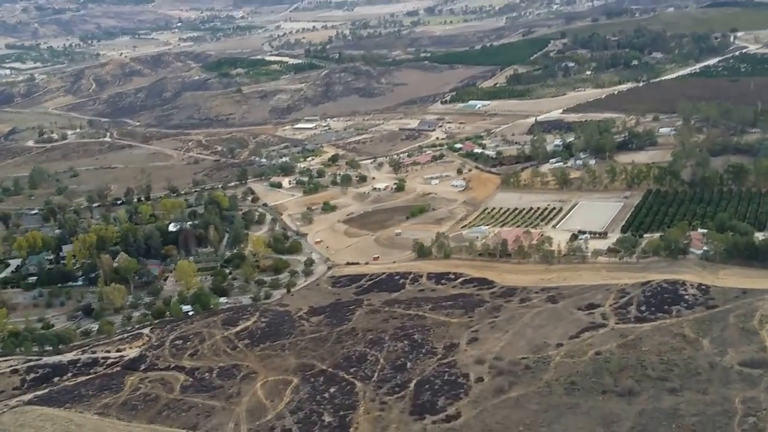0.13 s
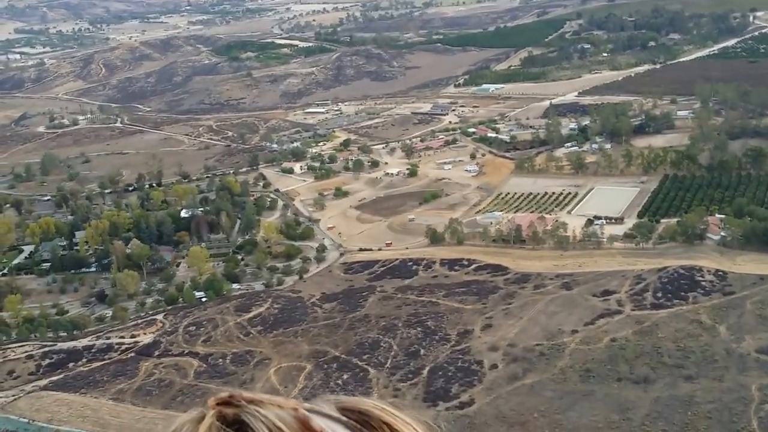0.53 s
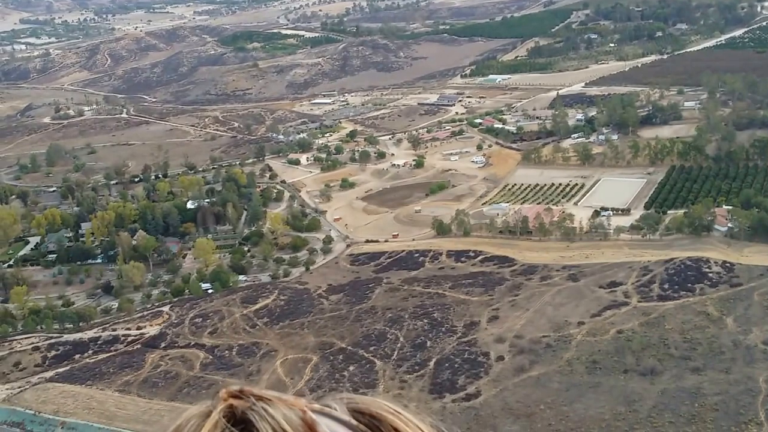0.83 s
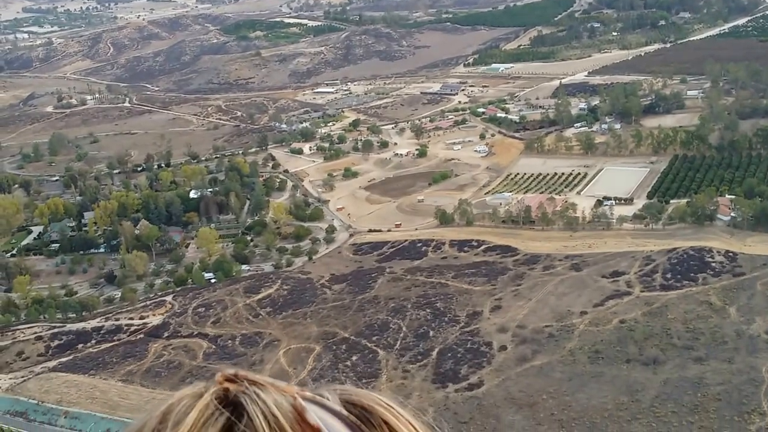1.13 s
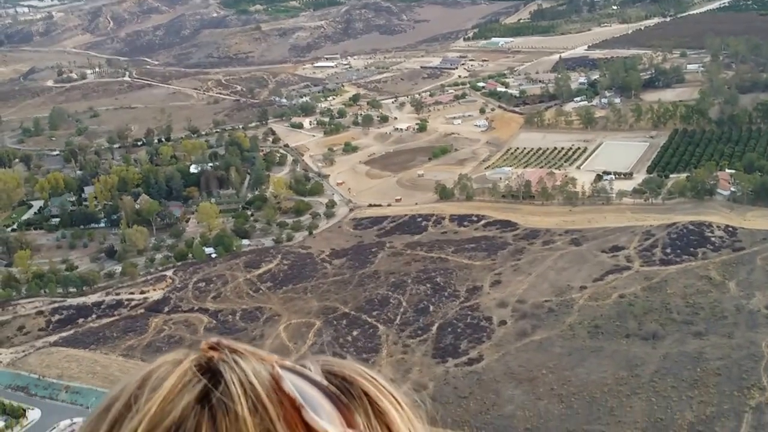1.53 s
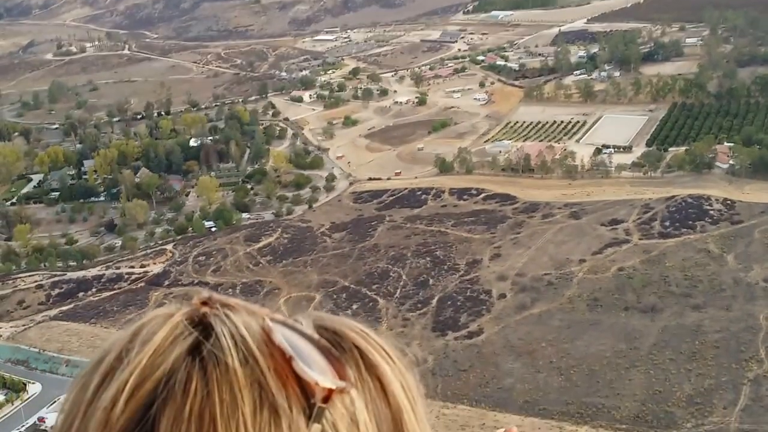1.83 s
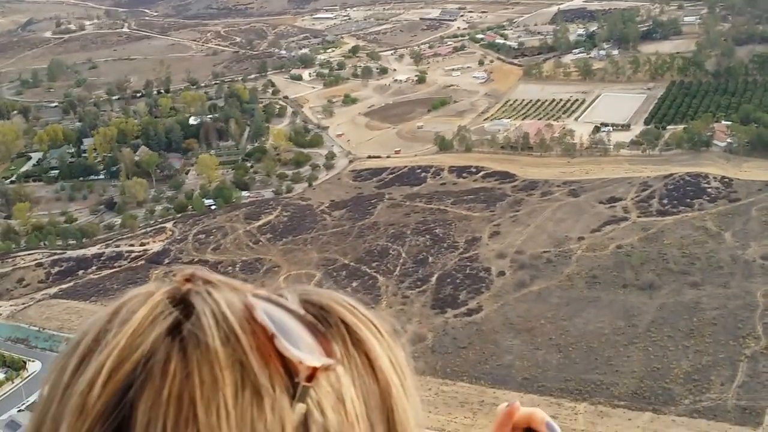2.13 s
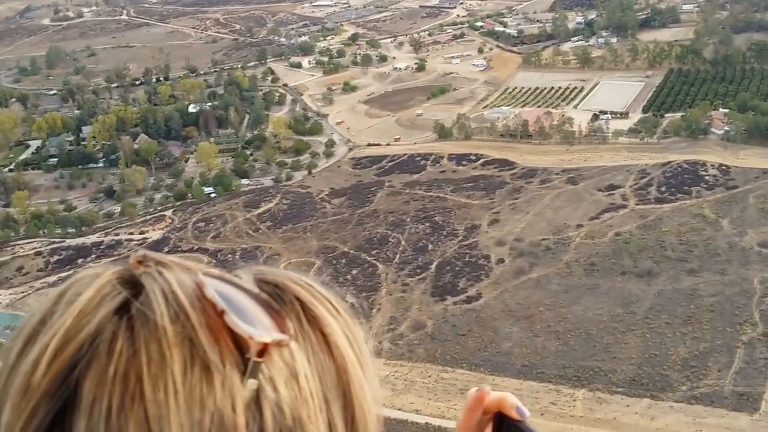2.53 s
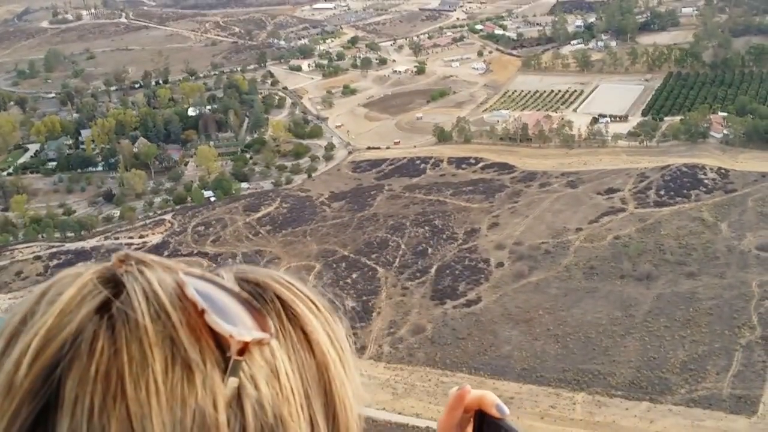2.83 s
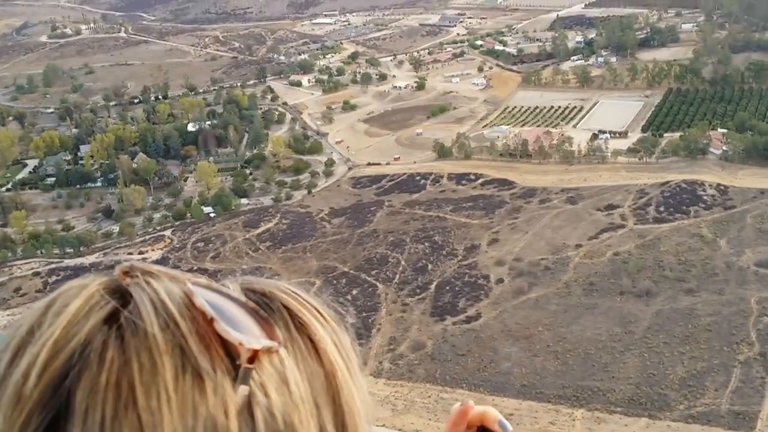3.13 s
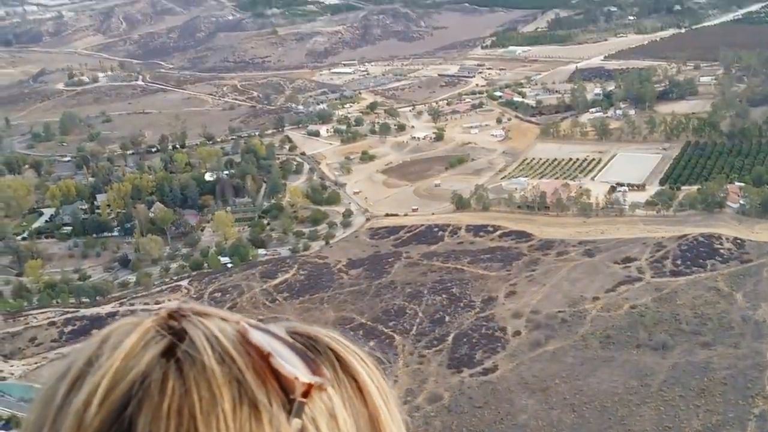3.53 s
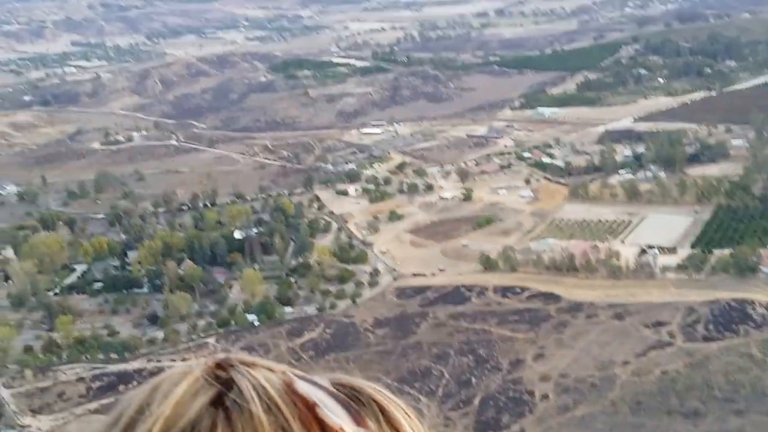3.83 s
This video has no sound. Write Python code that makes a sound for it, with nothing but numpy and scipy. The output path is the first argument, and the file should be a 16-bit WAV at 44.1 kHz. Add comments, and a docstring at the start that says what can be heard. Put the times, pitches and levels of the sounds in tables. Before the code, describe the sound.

A hot-air balloon's gas burner roars loudly and steadily, then cuts off abruptly to soft rushing air.

```python
"""A hot-air balloon's gas burner fires just above the open basket: a turbulent flame roars under the hiss of the gas jets.
The valve closes, the hiss fades, the flame goes out and the last gas spits in quick puffs.
What stays is what ran softly underneath: the rush of the pilot flame and the drone of a distant engine.
Flame, jets, spits and pilot are shaped noise; the engine is a stack of wavering sines."""
import sys
import numpy as np
from scipy import signal
from scipy.fft import rfft, irfft, next_fast_len
from scipy.io import wavfile
from scipy.ndimage import uniform_filter1d, map_coordinates

SR = 44100
rng = np.random.default_rng(int(sys.argv[2]) if len(sys.argv) > 2 else 0)


def materialize(psi):
    """Save the field psi as 16-bit PCM at rate SR to the path in sys.argv[1].

    A 1-D psi becomes a single channel; in a 2-D psi each row is a channel.
    """
    bounded = np.clip(np.atleast_2d(psi).T, -1, 1)
    quanta = np.round(bounded * 32767).astype(np.int16)
    wavfile.write(sys.argv[1], SR, quanta)


N = 176400  # samples, four seconds

# How alike the burner sounds at the two ports: close in the bass, diffuse between some narrow bands above.
# Each row: frequency in Hz, left-right likeness from 0 to 1.
BURNER_LIKENESS = [(100, 1), (450, 0.97), (1000, 0.84), (1300, 0.83), (1500, 0.88), (2050, 0.16),
                   (2350, 0.64), (2900, 0.12), (3350, 0.22), (3700, 0.41), (4100, 0.44), (4550, 0.6),
                   (5100, 0.3), (5800, 0.4), (6300, 0.36), (6850, 0.42), (7350, 0.05), (8000, 0.47),
                   (8800, 0.32), (9600, 0.16), (11200, 0.57), (12700, 0.53), (13400, 0.12), (15000, 0.3)]
BURNER_LEAD_S = 0.0004074  # the burner reaches the left port first


def amp(db):
    """Decibels to gain."""
    return 10 ** (np.asarray(db) / 20)


def unit(x):
    """Scaled to rms 1."""
    return x / np.sqrt(np.mean(x ** 2) + 1e-20)


def along(points, hz):
    """Reads a (Hz, value) curve at hz, with straight lines on a log frequency axis."""
    f, v = np.transpose(points)
    return np.interp(np.log(hz + 1), np.log(f + 1), v)


def curves(rows):
    """One value per sample for each column after the time."""
    s, *columns = np.transpose(rows)
    return [np.interp(np.arange(N) / SR, s, column) for column in columns]


def wobble(rate):
    """A smooth random curve, rate knots a second."""
    knots = rng.standard_normal(4096)
    return map_coordinates(knots, [np.arange(N) * rate / SR], mode="mirror")


def filtered(x, response):
    """x shaped by a complex response of frequency."""
    m = next_fast_len(N + SR // 2)  # spare room so that tails do not wrap round
    return irfft(rfft(x, m) * response(np.fft.rfftfreq(m, 1 / SR)), m)[..., :N]


def rush(spectrum, likeness, lead_s):
    """Stereo noise of rms 1 that reaches the left port lead_s early; mid against side sets the likeness."""
    def mid_side(hz):
        angle = np.arccos(np.clip(along(likeness, hz), -1, 1)) / 2
        return amp(along(spectrum, hz)) * [np.cos(angle), np.sin(angle)]

    def lead(hz):
        # half the lead forward on the left, half back on the right
        return np.exp(1j * np.pi * lead_s * np.outer([1, -1], hz))

    mid, side = filtered(rng.standard_normal((2, N)), mid_side)
    return unit(filtered(np.array([mid + side, mid - side]), lead))


def patchy(x, depth_db):
    """x with slow patches of random gain, about a kilohertz wide and a third of a second long."""
    z = signal.stft(x, nperseg=512)[2]
    field = uniform_filter1d(rng.standard_normal(z.shape), size=12, axis=1)
    field = uniform_filter1d(field, size=60, axis=2)
    return signal.istft(z * amp(depth_db * unit(field)), nperseg=512)[1][:, :N]


def flame(flutter_db):
    """Turbulent burning: a deep roar and a rougher middle range, which collapse from the top down."""
    # Each row: time in seconds, bass level in dB, middle level in dB, both before the trims below.
    flame_levels = [(0.03, -19.5, -25), (0.08, -16, -24), (0.7, -18.3, -24.5), (1.27, -17, -24),
                    (1.44, -16.5, -26), (1.56, -18, -25), (1.66, -17.5, -25.5), (1.95, -18, -26.5),
                    (2.65, -19, -24.5), (2.76, -16, -24), (2.95, -17, -24), (3.2, -18, -24.5)]
    # Colour of the roar. Each row: frequency in Hz, relative density in dB per Hz.
    roar_spectrum = [(25, -40), (38, -42), (55, -11.5), (80, -8), (115, 0.5), (170, -4), (205, 0),
                     (260, -5), (315, -3.5), (350, -9.5), (400, -3.5), (470, -5), (540, -5), (620, -14),
                     (740, -9), (900, -15.5), (1130, -18), (1400, -18), (1650, -20), (2100, -28),
                     (4000, -29.5), (9000, -90)]
    # Stereo lean of the roar. Each row: frequency in Hz, left minus right in dB.
    roar_tilt = [(60, 0), (200, -1.4), (320, -1.5), (390, -0.5), (530, -1), (680, -3), (800, 2.5),
                 (1000, -2.3), (1130, -2.5), (1400, -3), (1620, -7.5), (2200, 2.5)]
    bass_trim_db, middle_trim_db = -0.1, 3.5
    bass_churn_db, middle_churn_db = 0.33, 0.76  # the deep roar is steadier
    split_hz, rumble_hz = 380, 140
    out_s, out_db_per_s2 = 3.1955, 1650  # the flame dies ever faster
    middle_lead_s, rumble_lag_s = 0.011, 0.038  # the middle goes out first, the deepest rumble last
    t = np.arange(N) / SR

    def tilt(hz):
        return amp(np.outer([.5, -.5], along(roar_tilt, hz)))

    def below(x, edge_hz):
        return filtered(x, lambda hz: 1 / (1 + (hz / edge_hz) ** 10))

    def dying(start_s):
        return amp(-out_db_per_s2 * np.maximum(t - start_s, 0) ** 2)

    roar = filtered(rush(roar_spectrum, BURNER_LIKENESS, BURNER_LEAD_S), tilt)
    bass = below(roar, split_hz)
    middle = unit(roar - bass)
    bass = unit(bass)
    rumble = below(bass, rumble_hz)
    bass_db, middle_db = curves(flame_levels)

    low = rumble * dying(out_s + rumble_lag_s) + (bass - rumble) * dying(out_s)
    low = low * amp(bass_db + bass_trim_db + bass_churn_db * wobble(14))
    high = middle * dying(out_s - middle_lead_s)
    high = high * amp(middle_db + middle_trim_db + middle_churn_db * wobble(25.05))
    return (low + high) * amp(flutter_db)


def jets(flutter_db):
    """Gas hisses from the nozzles, shaken by the flame's flutter, finely ragged and drifting in colour."""
    # Gas flow through the jets. Each row: time in seconds, level in dB before the trim below.
    flow_levels = [(0.0, -24), (0.27, -24), (0.38, -26.5), (0.42, -24.5), (1.21, -23), (1.23, -24),
                   (1.72, -22.5), (1.76, -24), (2.65, -23), (2.93, -25.5), (3.2, -30.5), (3.25, -38),
                   (3.305, -59), (3.33, -64)]
    # Colour of the hiss. Each row: frequency in Hz, relative density in dB per Hz.
    hiss_spectrum = [(600, -56), (1900, -9), (3000, -4.5), (4000, -3.5), (5500, 2), (7500, 1.5),
                     (10000, 1.1), (12000, 1), (15000, -0.5)]
    jet_trim_db = 3
    flow_db, = curves(flow_levels)
    ragged_db = 0.5 * flutter_db + 0.5 * wobble(22) + 0.23 * wobble(490)
    hiss = patchy(rush(hiss_spectrum, BURNER_LIKENESS, BURNER_LEAD_S), depth_db=0.85)
    return hiss * amp(flow_db + jet_trim_db + ragged_db)


def spits():
    """Leftover gas leaves the nozzles in short puffs: a quick rise, a brief hold, a steady decay in dB."""
    # Each row: start in seconds, level in dB, time from start to decay in seconds.
    spit_puffs = [(3.334, -45, 0.0022), (3.347, -38, .0025), (3.3634, -50, 0.0018), (3.366, -41, 0.0025),
                  (3.373, -45, .003), (3.38, -50, .002)]
    # Colour of a spit. Each row: frequency in Hz, relative density in dB per Hz.
    puff_spectrum = [(200, -10), (700, 9), (1300, 8), (2000, -2), (3300, 2), (5200, 2), (8000, 2.5),
                     (11000, -7), (15000, -4)]
    attack_s, t60_s = .0008, 0.039  # rise time; time to decay by 60 dB
    t = np.arange(N) / SR
    envelope = np.zeros(N)
    for start_s, level_db, hold_s in spit_puffs:
        attack = np.clip((t - start_s) / attack_s, 0, 1)
        decay_db = 60 * np.maximum(t - start_s - hold_s, 0) / t60_s
        envelope += attack * amp(level_db - decay_db)
    return envelope * rush(puff_spectrum, BURNER_LIKENESS, BURNER_LEAD_S)


def hollowed(x):
    """The burner reaches the ports out of step; in three narrow, wandering bands their common part cancels."""
    # Extra phase lag of the right port. Each row: frequency in Hz, lag in radians.
    port_lag = [(400, -0.079), (1300, -0.084), (2100, 0.29), (2950, 0.7), (3500, 0.3), (4000, 0.87),
                (4300, 0.95), (5100, 0.22), (6000, 0.97), (6900, 0.79), (7700, -2.3), (9100, -0.17),
                (10700, 0.071), (13100, 0.67), (13800, -0.3), (15300, 1.2)]
    # Paths of the three hollows. Each row: time in seconds, centre in Hz, depth in dB.
    low_hollow = [(0.0, 1210, -0.5), (2.2, 1220, 2), (2.8, 1370, 9), (3.2, 1300, 14)]
    middle_hollow = [(0.0, 3750, 7), (0.6, 3650, 5.3), (0.85, 3580, 1.8), (1.1, 3240, 7.1),
                     (1.55, 3550, 14), (1.8, 3200, 4.7), (2.1, 3520, 24), (2.7, 3600, 18), (3.2, 3460, 4)]
    high_hollow = [(0.0, 5830, 8), (0.7, 5700, 6.3), (1.4, 5600, 4.6), (1.7, 5800, 9.1), (2.1, 5900, 9.4),
                   (2.9, 6100, 12), (3.2, 6000, 2)]
    # Half widths of the low, middle and high hollow in Hz, where the dip is down to 1/e of its dB depth.
    half_widths_hz = [144, 190, 130]

    hz, t, (left, right) = signal.stft(x, SR, nperseg=1024)
    right = right * np.exp(-1j * along(port_lag, hz))[:, None]
    dip_db = 0
    for rows, width_hz in zip([low_hollow, middle_hollow, high_hollow], half_widths_hz):
        s, centre_hz, depth_db = np.transpose(rows)
        offset_hz = hz[:, None] - np.interp(t, s, centre_hz)
        dip_db = dip_db + np.interp(t, s, depth_db) * np.exp(-(offset_hz / width_hz) ** 2)
    mid = amp(-dip_db) * (left + right) / 2
    side = (left - right) / 2
    return signal.istft(np.array([mid + side, mid - side]), SR, nperseg=1024)[1][:, :N]


def pilot():
    """The pilot flame and the open air rush softly throughout, as gently wavering noise."""
    # Each row: time in seconds, level in dB.
    pilot_levels = [(3.32, -51.5), (3.38, -49), (3.45, -55), (3.65, -54.5), (3.78, -54), (4.0, -54)]
    # Colour of the rush. Each row: frequency in Hz, relative density in dB per Hz.
    pilot_spectrum = [(30, -24), (65, -13), (100, -1.5), (160, -6), (280, -11.5), (550, -14), (850, -20.5),
                      (1250, -27), (1600, -24), (1950, -13.5), (2700, -23), (3700, -30.5), (4800, -26),
                      (5900, -35), (7200, -29), (9000, -29), (14000, -44)]
    # Stereo width of the rush. Each row: frequency in Hz, left-right likeness from 0 to 1.
    pilot_likeness = [(100, 0.83), (450, 0.7), (1200, 0.34), (2000, 0.22), (4000, 0.19), (12000, .3)]
    level_db, = curves(pilot_levels)
    return rush(pilot_spectrum, pilot_likeness, lead_s=0.00032) * amp(level_db + 1.5 * wobble(16))


def engine():
    """A far engine drones; each of its harmonics wavers on the way through the air."""
    # Each row: time in seconds, firing rate in Hz, gain in dB on all harmonics.
    engine_course = [(3.3, 61.45, 2), (3.55, 61.6, 3), (3.7, 61.3, -0.5), (3.85, 61.9, 3), (3.97, 60.9, 4)]
    # Each row: multiple of the firing rate, level in dB before that gain.
    engine_orders = [(1, -71), (2, -52), (3, -66), (4, -63.5), (5, -68.5), (6, -68.5), (8, -72),
                     (10, -78.5), (12, -81)]
    waver_db_per_order, waver_max_db = 1, 1.5  # higher harmonics waver more, up to a limit
    firing_hz, gain_db = curves(engine_course)
    phase = 2 * np.pi * np.cumsum(firing_hz) / SR
    drone = np.zeros(N)
    for order, level_db in engine_orders:
        waver_db = min(order * waver_db_per_order, waver_max_db) * wobble(11)
        start_phase = rng.uniform(0, 2 * np.pi)
        drone += amp(level_db + waver_db) * np.sin(round(order) * phase + start_phase)
    return np.sqrt(2) * amp(gain_db) * drone  # root two makes the levels rms


def scene():
    """Burner and background in open air, with no walls to answer."""
    flutter_db = 0.8 * wobble(60)  # fast turbulence shared by flame and jets
    burner = flame(flutter_db) + jets(flutter_db) + spits()
    return hollowed(burner) + pilot() + engine()


def record(dry):
    """Each microphone port adds its own peaks and dips; nothing is kept above the band limit."""
    # Resonances of the two ports. Each row: centre in Hz, half width in Hz, peak or dip in dB.
    left_port = [(7230, 620, 9)]
    right_port = [(7300, 580, -5), (8200, 590, 5.5), (13300, 690, -7)]
    top_hz = 15550

    def colour(port, hz):
        return amp(sum(db / (1 + ((hz - centre) / width) ** 2) for centre, width, db in port))

    def response(hz):
        return np.array([colour(left_port, hz), colour(right_port, hz)]) * (hz < top_hz)

    return filtered(dry, response)


dry = scene()
out = record(dry)
materialize(out)
```